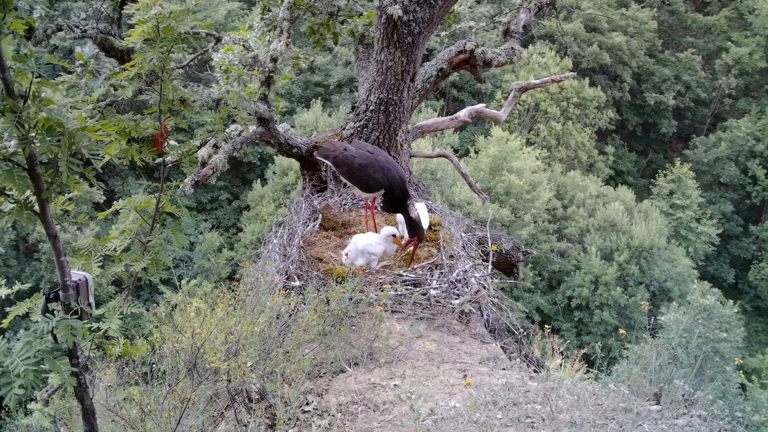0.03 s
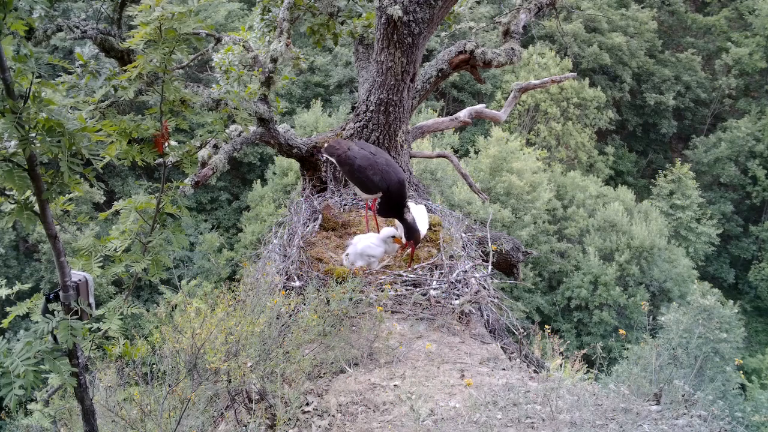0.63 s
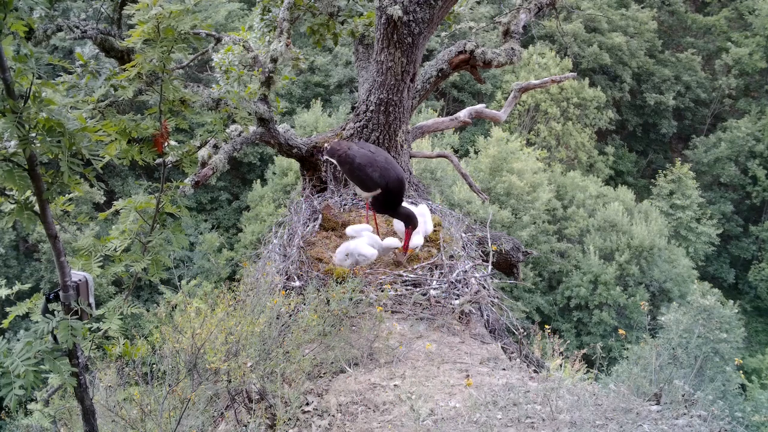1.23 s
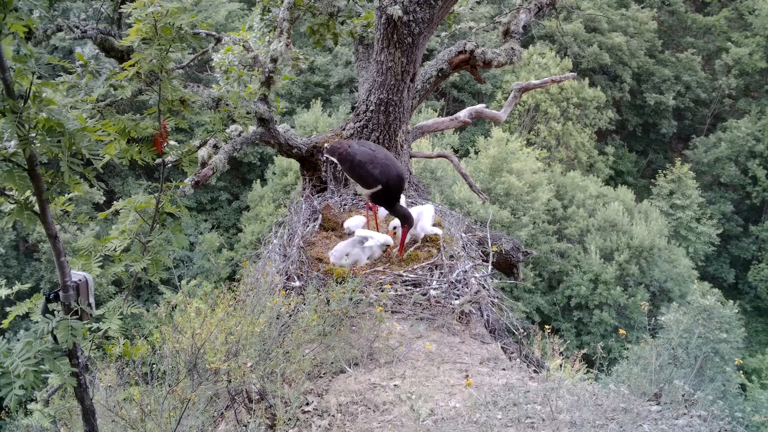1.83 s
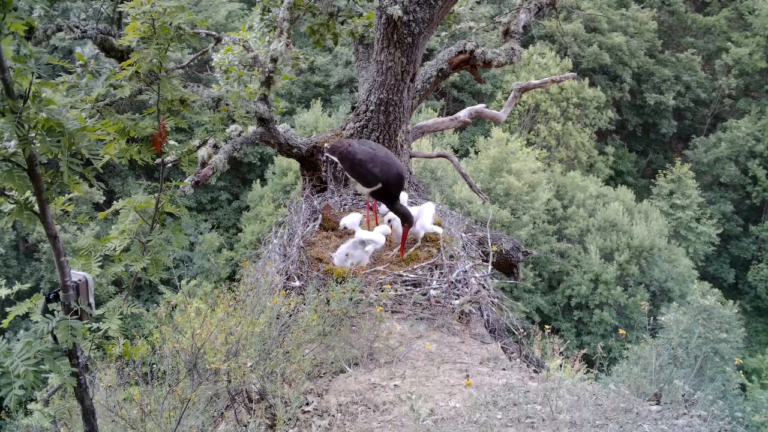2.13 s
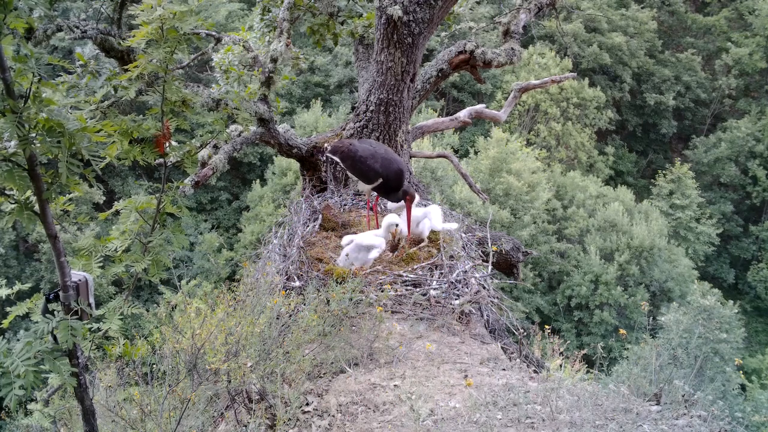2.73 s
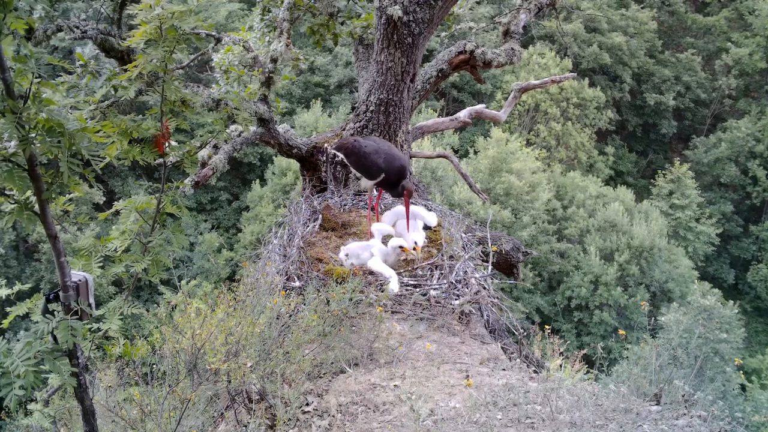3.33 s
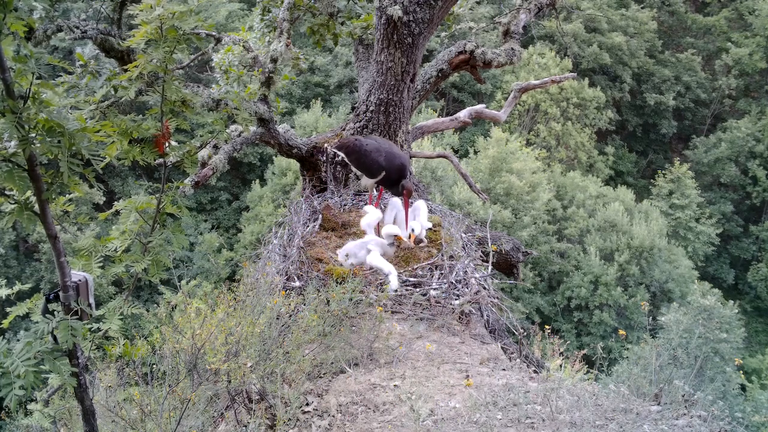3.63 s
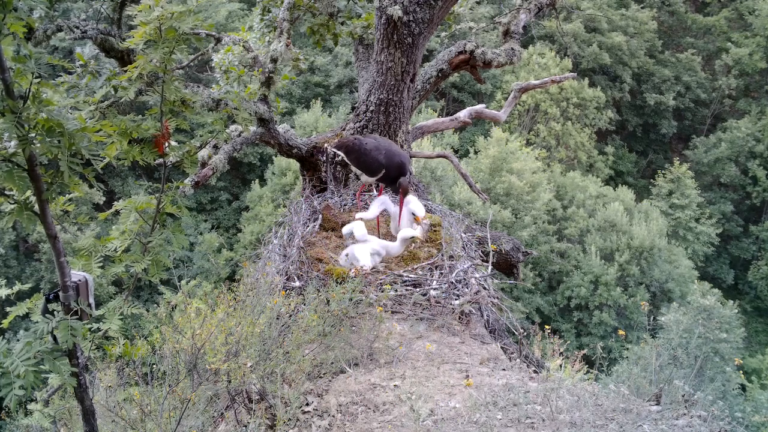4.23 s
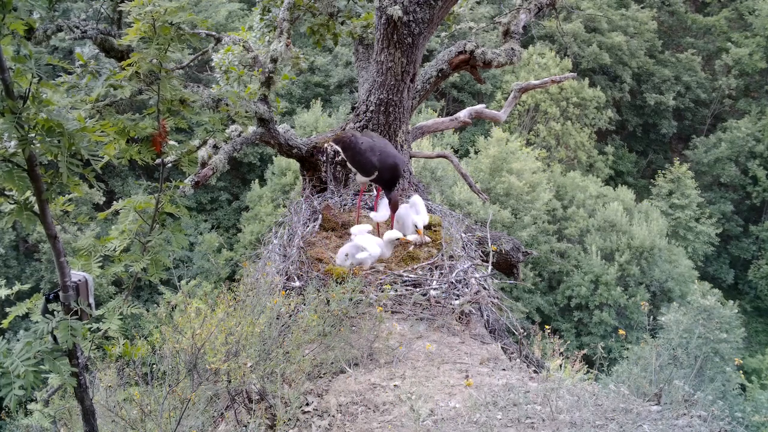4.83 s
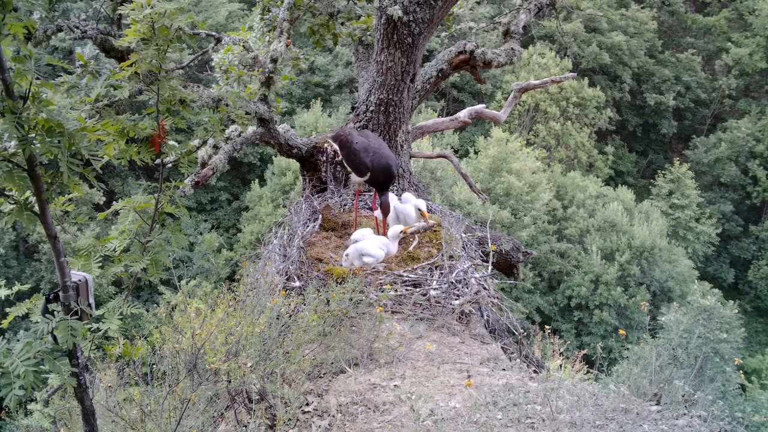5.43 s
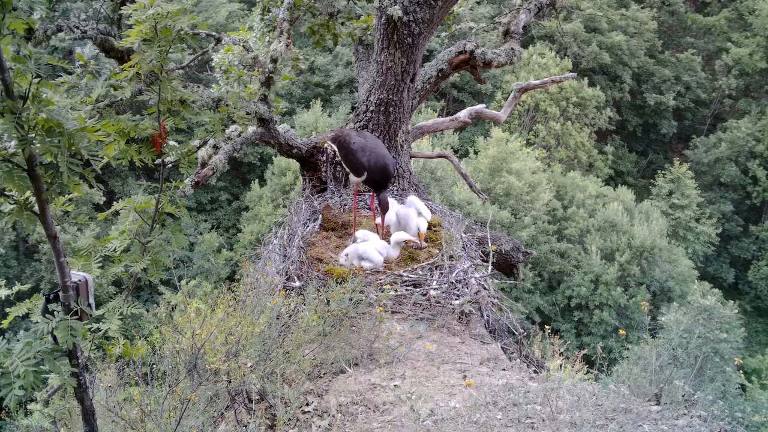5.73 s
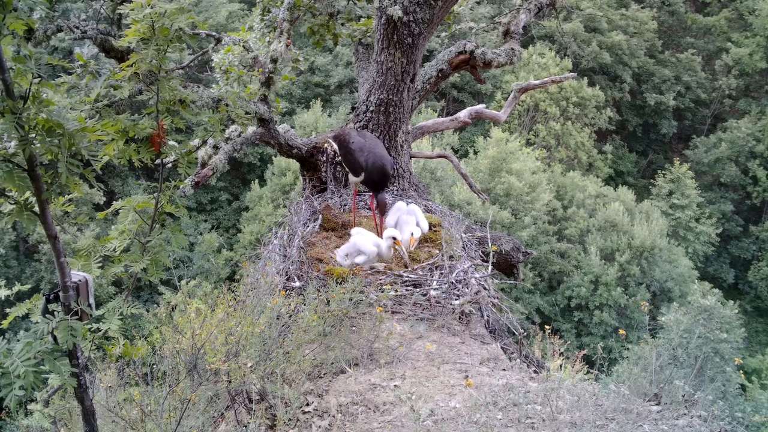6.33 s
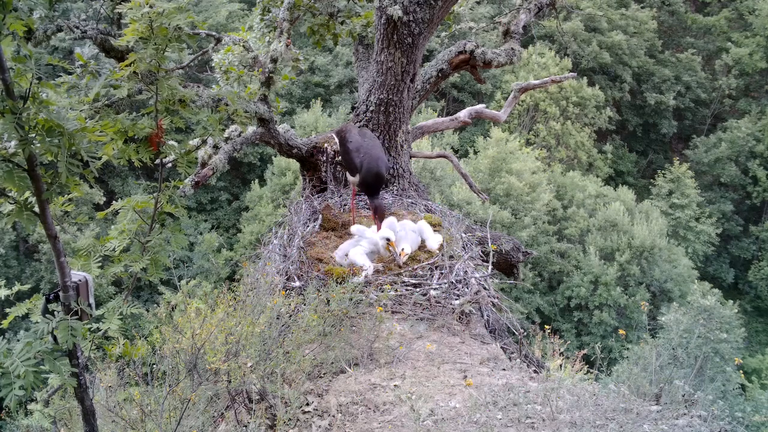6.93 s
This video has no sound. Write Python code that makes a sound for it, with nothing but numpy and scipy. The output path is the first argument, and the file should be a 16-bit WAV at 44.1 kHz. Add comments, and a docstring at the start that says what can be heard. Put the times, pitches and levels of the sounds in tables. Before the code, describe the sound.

Stork chicks beg from a stick nest in the woods for about seven seconds. Their calls are quick chains of high squeals, each a short stutter, an arching whistle and a sinking rasp, linked by low creaks. The squeals come in clusters at the start and around 1 second, weaken near 2 seconds, then return strongly around 3 seconds and continue in uneven bursts, with clear ones from 6 seconds to the end. Light, dry ticks of bills and twigs sound just before 1 second and more often from 3 seconds on. A low breeze rumbles faintly at first; from just under 3 seconds to about 6.5, irregular gusts buffet the microphone. Small birds whistle thin, faint notes far away between about 1 and 5.5 seconds. A soft, even hush of leaves lies underneath, and the trees give the calls a slight echo.

```python
"""Stork chicks squeal for food in a stick nest on a wooded slope while a parent tends them.
Each call is a chain of squeals from the syrinx, a bird's voice box: a stutter, a whistle that arches
up and down, then a sinking rasp. Slack membranes link the squeals with low creaks; bills and twigs tick.
Small birds sing far off, tree trunks scatter the sound, leaves hush and gusts buffet the microphone."""
import sys
import numpy as np
from scipy import signal
from scipy.fft import rfft, irfft
from scipy.io import wavfile
from scipy.ndimage import uniform_filter1d, map_coordinates

SR = 44100
rng = np.random.default_rng(int(sys.argv[2]) if len(sys.argv) > 2 else 0)


def dump_mix(stems):
    """Bounce the given channels to the path in sys.argv[1] as a 16-bit WAV at rate SR."""
    frames = np.atleast_2d(stems).T  # one column per channel
    limited = np.clip(frames, -1, 1)  # hard clip at full scale
    pcm = np.round(limited * 32767).astype(np.int16)
    wavfile.write(sys.argv[1], SR, pcm)


N = 308700

# Levels in the tables are relative: the functions add their own gains.
# Squeals, each an arch of pitch with a rasping tail:
# crest t/s, rise t/s, fall t/s, top f/Hz, foot f/Hz, level/dB, hoarseness (about 0-1),
# tail length t/s, tail level/dB
SQUEALS = [(.025, .004, .023, 2550, 2000, -32, .25, .052, -38),
           (.107, .007, .008, 2950, 2400, -32, .25, .015, -41),
           (.138, .002, .012, 2850, 2400, -33, .37, .06, -29),
           (.224, .015, .013, 3100, 2450, -31.5, 0.17, .012, -34),
           (.262, 0.019, .02, 3085, 2704, -32, 0.45, 0.047, -40),
           (.342, .012, .013, 3010, 2305, -35, 0.26, 0.064, -46),
           (.35, .012, .022, 1380, 1280, -35, .15, .004, -50),
           (.465, .021, 0.021, 3180, 2300, -37, 0.19, 0.017, -48),
           (0.862, .002, 0.01, 3030, 2330, -35, 0.06, 0.02, -51),
           (.919, .015, .016, 3180, 2400, -34.5, 0.66, .008, -38),
           (.955, 0.015, 0.017, 3700, 2593, -30.5, 0.56, 0.043, -30),
           (1.019, 0.0058, .02, 2696, 2210, -40, 1.02, .05, -40),
           (1.11, .01, .02, 2600, 2155, -42.5, 1.03, 0.049, -45.5),
           (1.215, 0.0018, .04, 3850, 2750, -31, 0.48, 0.011, -43),
           (1.326, 0.025, 0.044, 3010, 2725, -29.5, .05, 0.045, -48),
           (1.6, .014, .025, 3400, 3100, -46, .5, .01, -50),
           (1.643, 0.019, .018, 2930, 2000, -41, 0.53, 0.013, -45),
           (1.735, 0.037, 0.027, 4020, 2650, -41, 0.46, 0.022, -43),
           (1.822, .026, .018, 3290, 2380, -42, 0.85, 0.018, -41),
           (1.872, 0.0033, .02, 3700, 2210, -41, 0.95, 0.01, -43),
           (1.965, 0.029, 0.028, 3090, 2253, -46, 0.73, .015, -48),
           (2.387, .02, .026, 3600, 3100, -35, 0.2, .012, -47),
           (2.43, 0.0086, .055, 2340, 1597, -39, .35, 0.0037, -45),
           (2.533, .01, 0.0096, 3420, 2800, -31, 0.48, .045, -41.5),
           (2.93, 0.029, 0.033, 2940, 2256, -33, 0.22, 0.057, -32.5),
           (3.048, 0.028, 0.025, 3790, 2663, -30.5, 0.29, 0.042, -30),
           (3.155, 0.025, 0.022, 4230, 2750, -29, 0.1, 0.031, -27),
           (3.363, 0.0029, 0.02, 3700, 3040, -42, 0.77, 0.013, -47),
           (3.568, .022, 0.029, 2954, 2210, -36, .25, .015, -49.5),
           (3.85, .012, .012, 4100, 3600, -42, .6, .01, -52),
           (3.896, .002, 0.01, 3850, 2950, -29.5, 0.43, .055, -43),
           (4.017, .037, .034, 4170, 2720, -35, 0.36, 0.062, -44.5),
           (4.123, .013, .028, 2606, 1556, -39, 0.21, .004, -45),
           (4.303, .025, .008, 3500, 2700, -44, .5, .004, -52),
           (4.331, .002, .012, 3950, 2900, -36.5, 0.49, 0.086, -41),
           (4.551, .024, .023, 3820, 2850, -32, .2, .062, -30.5),
           (5.056, .026, .024, 3700, 2670, -33, .15, 0.038, -38.5),
           (5.17, .036, 0.035, 3830, 2510, -36, 0.18, 0.017, -54),
           (5.287, .035, 0.033, 4140, 2404, -36.5, 0.23, .015, -56),
           (5.652, 0.031, .028, 3730, 2500, -42, .6, 0.064, -46),
           (5.753, 0.0077, 0.017, 3400, 2590, -33.5, .2, 0.054, -41.5),
           (5.867, 0.023, .03, 3417, 2394, -35.5, .12, .02, -47),
           (6.213, .02, 0.023, 3760, 2803, -29.5, .03, 0.053, -33),
           (6.323, .026, .026, 4190, 2630, -31, 0.1, 0.051, -32.5),
           (6.42, .012, .02, 3150, 2694, -32.5, .4, 0.031, -35.5),
           (6.478, 0.0079, 0.013, 3316, 2545, -33, .5, 0.033, -41),
           (6.82, 0.025, 0.021, 3630, 2695, -31, 0.13, 0.048, -34),
           (6.928, 0.028, .026, 4500, 2746, -28, 0.13, 0.042, -32)]
# Treble in the squeals as the scene goes on: t/s, level/dB
SQUEAL_TREBLE = [(0, -2), (0.9, 0), (1.22, 0), (1.31, -11), (1.6, -2), (2.4, 0), (3.1, 1), (4.0, 5),
                 (4.55, -1), (5.2, 4), (5.7, -2), (6.2, 1), (7, 2)]
# How the throat shapes the whistle and breath: f/Hz, level/dB
THROAT_SPECTRUM = [(1000, -6), (1600, 3), (2300, 4.5), (3100, 4.5), (3500, 4.5), (4100, -3.5), (5000, -26)]
# How the bill shapes the overtones and hiss: f/Hz, level/dB
BILL_SPECTRUM = [(3500, -11.5), (4700, -4.5), (5800, 1), (7000, 0.5), (8300, -1), (10000, -8.5),
                 (11500, -25), (16000, -44)]
# Creaks that open, link and close the calls: start t/s, end t/s, throat level/dB, chest level/dB
CREAKS = [(.116, 0.205, -46.5, -66.5), (0.269, 0.374, -43, -59), (.873, .913, -39, -58.5),
          (1.01, 1.057, -45, -57), (1.14, 1.158, -35.5, -53.5), (1.37, 1.42, -48, -58.5),
          (1.542, 1.59, -43.5, -58.5), (1.751, 1.919, -48.5, -59.5), (2.321, 2.36, -38, -52),
          (2.425, 2.455, -38.5, -52.5), (2.582, 2.624, -51, -55), (2.869, 2.888, -42.5, -48.5),
          (2.969, 3.007, -36, -57.5), (3.058, 3.117, -43, -57), (3.302, 3.323, -43, -50.5),
          (3.395, 3.451, -35.5, -62), (3.518, 3.546, -42.5, -52.5), (3.608, 3.627, -41, -67),
          (3.81, 3.845, -39, -57), (3.968, 3.984, -32.5, -48.5), (4.041, 4.099, -41, -67.5),
          (4.253, 4.29, -44, -54.5), (4.363, 4.422, -32.5, -53), (4.511, 4.524, -39, -55),
          (4.64, 4.682, -42.5, -63), (4.997, 5.026, -33.5, -56), (5.085, 5.136, -38, -73),
          (5.197, 5.256, -38, -74), (5.318, 5.348, -36, -58), (5.676, 5.709, -30, -50.5),
          (5.755, 5.826, -37, -65), (5.886, 5.949, -44.5, -53), (6.157, 6.178, -49.5, -50),
          (6.289, 6.301, -56, -46.5), (6.379, 6.424, -43, -53.5), (6.482, 6.599, -60, -54),
          (6.759, 6.775, -50, -49)]
# How the throat rings in a creak: f/Hz, level/dB
CREAK_THROAT_SPECTRUM = [(900, -49.5), (1300, -10), (1600, 2.5), (1950, 0.5), (2500, -21.5), (3700, -6),
                         (4700, -27), (7500, -15), (12000, -33)]
# How the chest rings in a creak: f/Hz, level/dB
CREAK_CHEST_SPECTRUM = [(120, -13), (250, -0.5), (420, -3), (750, -6.5), (1100, -9), (2000, -49.5)]
# Ticks of bills and twigs: t/s, level/dB, ring f/Hz
TICKS = [(0.535, -17.5, 2220), (.786, -15, 2580), (0.826, -16.5, 1412), (2.957, -19, 7750),
         (3.207, -19.5, 7360), (3.487, -18, 2200), (4.178, -21, 7700), (4.442, -28, 7300),
         (4.754, -23, 6740), (4.94, -23.5, 8000), (4.976, -20.5, 9000), (5.504, -21.5, 7600),
         (6.158, -17.5, 6600), (6.186, -25, 8900), (6.388, -19, 6860), (6.524, -26, 3500),
         (6.547, -20.5, 4300), (6.759, -21, 3800), (6.767, -17.5, 5620)]
# Echoes off nest and trunk: delay t/s, gain (a minus sign flips the wave)
NEST_ECHOES = [(.0011, -0.22), (.0029, -0.29), (.0052, 0.058)]
# Strength of the breeze: t/s, level/dB
BREEZE = [(0.0, -48.5), (0.43, -31.5), (0.68, -44), (1.69, -37), (1.91, -46), (2.79, -21.5), (3.23, -31.5),
          (3.33, -19), (3.45, -21.5), (4.76, -22), (4.78, -18), (5.5, -20.5), (5.71, -28), (6.57, -16),
          (6.71, -34.5), (7.0, -27.5)]
# Single gusts: peak t/s, half width t/s, level/dB
GUSTS = [(2.71, .035, -22), (2.8, .022, -12), (3.35, .02, -26), (3.47, .03, -28), (3.58, .05, -23),
         (3.7, .04, -18), (3.82, .035, -14), (3.89, .025, -18), (4.06, .04, -23), (4.2, .03, -28),
         (4.375, .035, -11.5), (4.52, .035, -15), (4.79, .025, -19), (4.93, .035, -18), (5.245, .03, -18),
         (5.31, .02, -25), (5.45, .04, -19), (6.04, .035, -21), (6.19, .035, -23), (6.295, .025, -15),
         (6.4, .05, -18), (6.55, .03, -21)]
# Deep rumble of the breeze: f/Hz, level/dB
RUMBLE_SPECTRUM = [(12, 3.5), (28, 0), (50, -17), (90, -49), (200, -63.5)]
# Buffeting by eddies, small swirls of air: f/Hz, level/dB
BUFFET_SPECTRUM = [(25, 8), (60, 7), (115, -8), (170, -22.5), (250, -38), (600, -66)]
# Notes of far songbirds: start t/s, end t/s, first f/Hz, last f/Hz, level/dB
SONG_NOTES = [(1.149, 1.445, 5920, 5610, -61), (1.181, 1.996, 4980, 4380, -62),
              (2.44, 2.666, 7710, 7620, -55.5), (2.803, 2.833, 4400, 3740, -46),
              (3.265, 3.294, 3570, 3570, -42), (3.371, 3.466, 7790, 6660, -47),
              (3.424, 3.553, 7360, 7860, -51), (3.617, 3.647, 4430, 3500, -45.5),
              (3.72, 3.76, 4250, 4150, -47), (4.73, 4.755, 4300, 3400, -51),
              (4.798, 4.829, 4690, 2770, -51.5), (4.887, 4.956, 3700, 3050, -54.5),
              (5.414, 5.49, 3390, 2910, -59)]
# Hush of the leaves: f/Hz, level/dB
LEAF_SPECTRUM = [(59, -3.5), (100, -29), (140, -3), (276, -11), (314, -11), (500, -11.5), (544, -20),
                 (631, -14.5), (1070, -14), (1780, -17.5), (4340, -17.5), (6350, -21), (15800, -28.5)]

USUAL_DB = -35   # a chick's ordinary voice level


def squeals(whistle_db=-.2, overtone_db=-46.3, breath_db=-11, hiss_db=-51.5):
    """The syrinx whistles an arch; around it the tone stutters, slackens and beats with its other half."""
    sag_hz_per_s, slacken_s = 3600, .07
    taut_stutter_hz, slack_stutter_hz, stutter_height, stutter_depth = 69.2, 105, .19, .62
    wobble, jitter, beat_hz, other_half_db, third_overtone_db = .07, .028, 420, -3, -10
    lead_share, lead_db, swell_db = .6, 2.5, 2.2   # the opening stutter lasts this share of the rise
    rebound_db, rebound_s, tail_fade_db = 5, .012, 3   # the tail starts loud, then fades
    catch_db, catch_s = 5, .0025   # the voice catches at each foot of the arch
    pinch_hz, pinch_db_per_hz = 3350, .008   # the voice pinches off above this pitch
    treble_follow = .6   # overtones and hiss take this share of the swing about the usual level
    tone, overtones, breath, hiss = np.zeros((4, N))
    for crest, rise, fall, top, foot, db, hoarse, tail, tail_db in SQUEALS:
        start, end = crest - rise, crest + fall
        at, _, gate = stretch(start - lead_share * rise, end + tail, fade=.003)
        t, size = at / SR, len(at)
        before, after = np.maximum(start - t, 0), np.maximum(t - end, 0)
        arch_place = np.interp(t, [start, crest, end], [-1, 0, 1])
        arch_hz = top - (top - foot) * arch_place ** 2 - sag_hz_per_s * after
        in_arch = uniform_filter1d(1. * (before + after == 0), size=80)
        slack = np.clip(hoarse + (before + after) / slacken_s, 0, 1)

        # each stutter is a tiny hop in pitch, counted from the foot of the large arch
        stutter_hz = taut_stutter_hz + (slack_stutter_hz - taut_stutter_hz) * slack
        turns = np.cumsum(stutter_hz * np.exp(.404 * slack * drift(89.9, size))) / SR
        turns_at_foot = np.interp(np.where(t < crest, start, end), t, turns)
        hop = np.abs(np.sin(np.pi * (turns - turns_at_foot)))
        stutter = 1 - in_arch * (1 - slack)
        waver = slack * (wobble * drift(90.2, size) + jitter * drift(1500, size))
        pitch = arch_hz * (1 + stutter_height * stutter * (hop - .3 - .35 * slack) + waver)
        phase = phase_of(pitch)
        # the other half of the syrinx sings a little lower, so the two tones beat
        other_phase = phase - phase_of(beat_hz * np.exp(.265 * drift(63.1, size)))
        other_gain = from_db(other_half_db + 5 * drift(68.8, size)) * slack

        opening_db = np.where(before > 0, (db + tail_db) / 2 + lead_db, db + swell_db * arch_place)
        dying_db = tail_db + rebound_db * np.exp(-after / rebound_s) - tail_fade_db * after / tail
        level_db = uniform_filter1d(np.where(t > end, dying_db, opening_db), size=100)
        dips = 1 - stutter_depth * stutter * (1 - hop ** 2)
        flutter = from_db(1.7 * np.sqrt(slack) * drift(94.7, size))
        from_foot_s = np.minimum(abs(t - start), abs(t - end))
        catch = from_db(-catch_db * np.exp(-(from_foot_s / catch_s) ** 2))
        flow = gate * dips * flutter * catch
        pinch_db = pinch_db_per_hz * np.maximum(arch_hz - pinch_hz, 0)
        treble_db = treble_follow * (level_db - USUAL_DB) + np.interp(crest, *np.transpose(SQUEAL_TREBLE))
        tone_gain = flow * from_db(level_db - pinch_db)
        treble_gain = flow * from_db(treble_db - pinch_db)

        tone[at] += tone_gain * (np.sin(phase) + other_gain * np.sin(other_phase))
        upper_tones = np.sin(2 * phase) + other_gain * np.sin(phase + other_phase)
        upper_tones += from_db(third_overtone_db) * np.sin(3 * phase)
        overtones[at] += treble_gain * from_db(4.5 * drift(118, size)) * upper_tones
        breath[at] += tone_gain * slack
        hiss[at] += treble_gain * (.5 + slack)
    return (from_db(whistle_db) * colour(tone, THROAT_SPECTRUM)
            + from_db(overtone_db) * colour(overtones, BILL_SPECTRUM)
            + from_db(breath_db) * breath * shaped_noise(THROAT_SPECTRUM)
            + from_db(hiss_db) * hiss * shaped_noise(BILL_SPECTRUM))


def creaks(pulse_hz=230, slowing=.7, puff_s=.0026, puff_gain=.25, throat_db=-2, chest_db=4, croak_db=2):
    """Slack membranes slap in uneven, slowing pulses that ring throat and chest and set off a croak."""
    usual_croak_hz, croak_hz_per_db = 1760, 13   # a louder creak croaks higher
    croak_wander, croak_fall = .06, .06
    out = np.zeros(N)
    for start, end, db, low_db in CREAKS:
        at, progress, gate = stretch(start, end, fade=.0065)
        size = len(at)
        slap_hz = pulse_hz * np.exp(.3 * drift(150, size) - slowing * progress)
        slap_count = np.floor(np.cumsum(slap_hz) / SR)
        slaps = np.diff(slap_count, prepend=0) * gate * from_db(6.2 * drift(235, size))
        air = signal.lfilter([1], [1, -np.exp(-1 / (puff_s * SR))], slaps)   # a dying puff per slap
        source = slaps + puff_gain * air * rng.standard_normal(SR // 2)[:size]
        croak_hz = usual_croak_hz + croak_hz_per_db * (db - USUAL_DB)
        bend = np.exp(croak_wander * drift(60, size) - croak_fall * (progress - .5))
        croak_gain = gate * np.sqrt(np.abs(uniform_filter1d(air, size=200)))
        croak = unit_power(croak_gain * np.sin(phase_of(croak_hz * bend)))
        throat = unit_power(colour(source, CREAK_THROAT_SPECTRUM)) + from_db(croak_db) * croak
        out[at] += from_db(db + throat_db) * unit_power(throat)
        out[at] += from_db(low_db + chest_db) * unit_power(colour(source, CREAK_CHEST_SPECTRUM))
    return out


def ticks(decay_s=.0034, tick_db=-7, octave_away_db=-14):
    """Bills and twigs give light, dry cracks, each with its own broad ring, dulled by distance."""
    out = np.zeros(N)
    t = np.arange(SR // 20) / SR
    for start, db, hz in TICKS:
        crack = rng.standard_normal(len(t)) * np.exp(-t / decay_s)
        ring = [(hz / 2, octave_away_db), (hz, 0), (hz * 2, octave_away_db), (hz * 10, 2 * octave_away_db)]
        out[int(start * SR) + np.arange(len(t))] += from_db(db + tick_db) * colour(crack, ring)
    return signal.sosfilt(signal.butter(3, 9500, fs=SR, output="sos"), out)


def nest_echoes(sound):
    """The nest and its trunk throw back a few very quick echoes."""
    sample = np.arange(N)
    return sum(gain * np.interp(sample - delay * SR, sample, sound) for delay, gain in NEST_ECHOES)


def wind(rumble_db=-1, eddy_db=-15, buffet_db=2.5, hard_db=-2, hard_pitch_ratio=1.8):
    """The breeze rumbles and swirls; gusts add lumpy buffeting, brighter the harder they blow."""
    t = np.arange(N) / SR
    breeze = from_db(np.interp(t, *np.transpose(BREEZE)))
    gusts = sum(from_db(db) * np.exp(-((t - peak) / width) ** 2) for peak, width, db in GUSTS)
    deep_noise = steady(colour(rng.standard_normal(N), RUMBLE_SPECTRUM), size=4000)
    rumble = from_db(rumble_db) * breeze * deep_noise
    eddies = from_db(6.5 * drift(55, N)) * rng.standard_normal(N)
    buffet_gain = from_db(eddy_db) * breeze + from_db(buffet_db) * gusts
    buffet = buffet_gain * steady(colour(eddies, BUFFET_SPECTRUM), size=2000)
    # the hardest gusts shed higher-pitched eddies
    hard_spectrum = [(hard_pitch_ratio * hz, db) for hz, db in BUFFET_SPECTRUM]
    hard_buffet = from_db(hard_db) * gusts ** 2 * steady(colour(eddies, hard_spectrum), size=2000)
    return signal.sosfilt(signal.butter(4, 700, fs=SR, output="sos"), rumble + buffet + hard_buffet)


def songbirds(song_db=-3, trill=.028):
    """Small birds whistle thin notes that glide and quiver in pitch."""
    out = np.zeros(N)
    for start, end, first_hz, last_hz, db in SONG_NOTES:
        at, progress, gate = stretch(start, end, fade=.012)
        glide_hz = first_hz + (last_hz - first_hz) * progress
        pitch = glide_hz * (1 + trill * drift(200, len(at)))
        out[at] += from_db(db + song_db) * gate * np.sin(phase_of(pitch))
    return out


def forest_echo(sound, decay_s):
    """Countless trunks scatter a sound into a smooth tail that dies by 60 dB in decay_s."""
    t = np.arange(SR) / SR
    build_up = 1 - np.exp(-t / .013)
    tail = rng.standard_normal(SR) * np.exp(-np.log(1000) * t / decay_s) * build_up
    return signal.fftconvolve(sound, tail / np.linalg.norm(tail))[:N]


def leaf_hush(level_db=-56.5):
    """The leaves of the wood blend into one soft, even noise."""
    return from_db(level_db) * shaped_noise(LEAF_SPECTRUM)


def from_db(db):
    """Turn decibels into a gain to multiply by."""
    return 10 ** (np.asarray(db) / 20)


def unit_power(x):
    """Scale a sound so that its average power is 1."""
    return x / np.sqrt(np.mean(x ** 2) + 1e-20)


def steady(x, size):
    """Even out the slow swells of a noise, averaging over size samples."""
    return x / np.sqrt(uniform_filter1d(x ** 2, size) + 1e-12)


def phase_of(hz):
    """Add up a changing pitch into the angle of a sine wave."""
    return 2 * np.pi * np.cumsum(hz) / SR


def colour(x, spectrum, size=4096):
    """Make each frequency louder or softer, following rows of f/Hz, level/dB."""
    hz, db = np.transpose(spectrum)
    log_hz = np.log(np.maximum(np.arange(size // 2 + 1) * SR / size, 1))
    cepstrum = irfft(np.log(from_db(np.interp(log_hz, np.log(hz), db))))
    # keep one side only, so the filter rings after a sound and never before it
    cepstrum[1:size // 2] *= 2
    cepstrum[size // 2 + 1:] = 0
    response = irfft(np.exp(rfft(cepstrum))) * np.hanning(2 * size)[size:]
    return signal.fftconvolve(x, response)[:len(x)]


def shaped_noise(spectrum):
    """Noise with the given spectrum and a power of 1."""
    return unit_power(colour(rng.standard_normal(N), spectrum))


def drift(rate_hz, size):
    """A smooth random wander that typically strays about 1 from zero."""
    knots = rng.standard_normal(4096)
    return map_coordinates(knots, [np.arange(size) * rate_hz / SR], order=3, mode="wrap")


def stretch(start, end, fade):
    """Give one sound's sample numbers, its progress from 0 to 1 and a gate that fades it in and out."""
    at = np.arange(max(int((start - fade) * SR), 0), min(int((max(end, start) + fade) * SR), N))
    t = at / SR
    progress = np.clip((t - start) / max(end - start, fade), 0, 1)
    ramp = np.clip(np.minimum(t - start, end - t) / (2 * fade) + .5, 0, 1)
    return at, progress, np.sin(ramp * np.pi / 2) ** 2


def scene():
    """Mix the nest and its echoes with far song, leaves and wind into one channel."""
    direct = squeals() + creaks() + ticks()
    nest = from_db(-.5) * (direct + nest_echoes(direct))
    short_echo = from_db(-12.5) * forest_echo(nest, decay_s=.12)
    long_echo = from_db(-26.5) * forest_echo(nest, decay_s=.92)
    song = songbirds()
    far_song = from_db(5) * (song / 2 + forest_echo(song, decay_s=.72))   # mostly echo, from so far away
    return (nest + short_echo + long_echo + far_song + leaf_hush() + wind())[None]


def record(dry, cutoff_hz=15900):
    """Cut off the very highest treble steeply."""
    return signal.sosfilt(signal.ellip(12, .1, 90, cutoff_hz, fs=SR, output="sos"), dry)


dry = scene()
out = record(dry)
dump_mix(out)
```